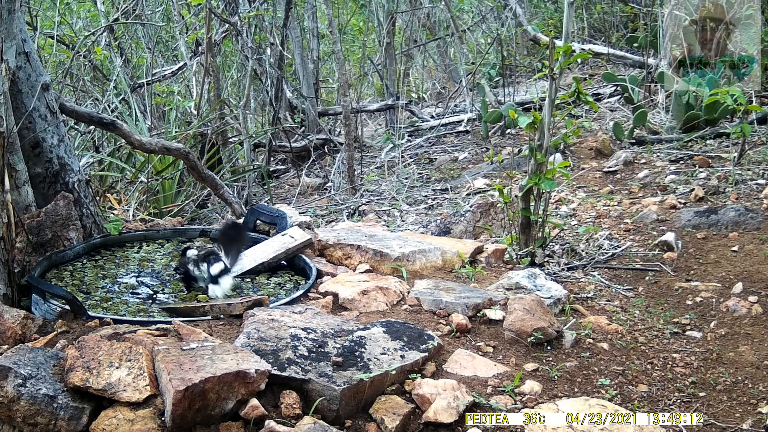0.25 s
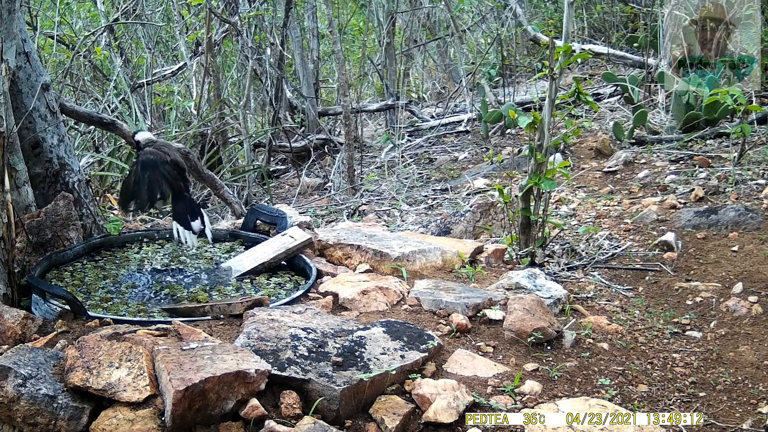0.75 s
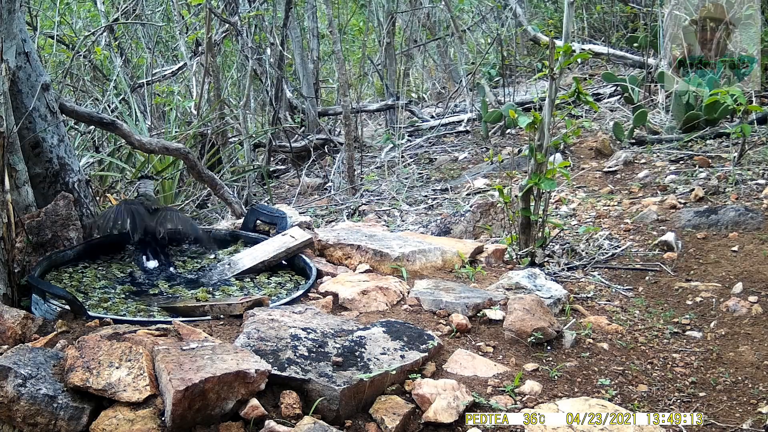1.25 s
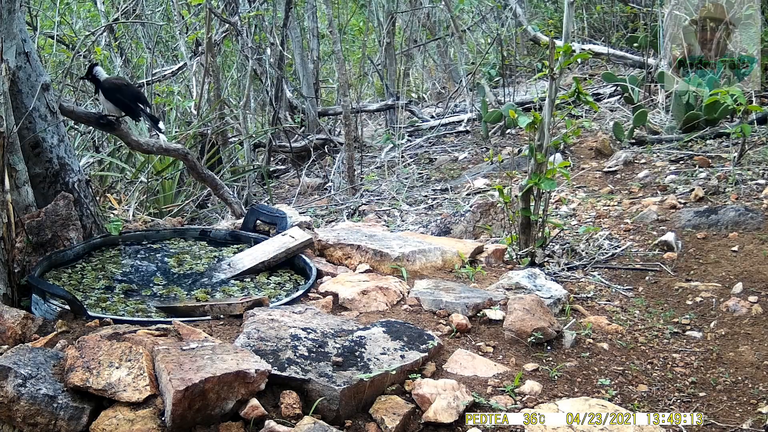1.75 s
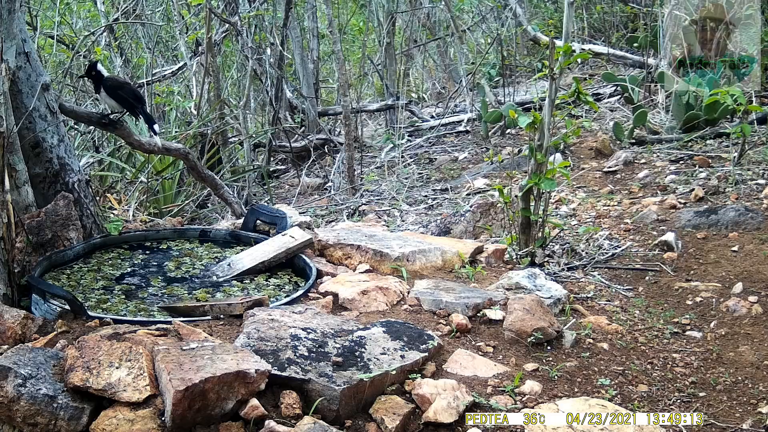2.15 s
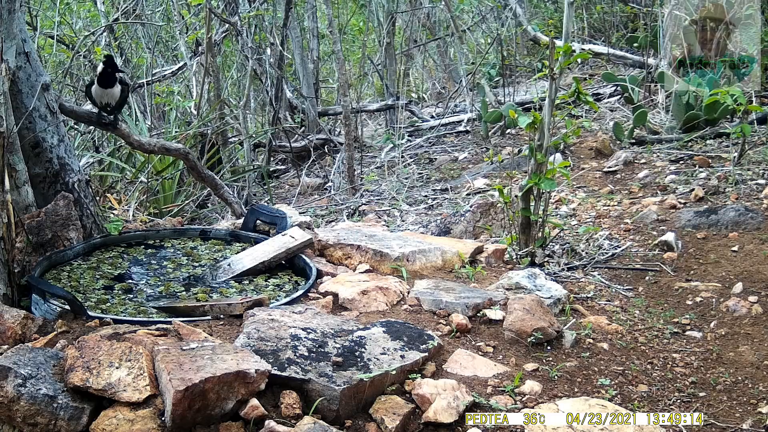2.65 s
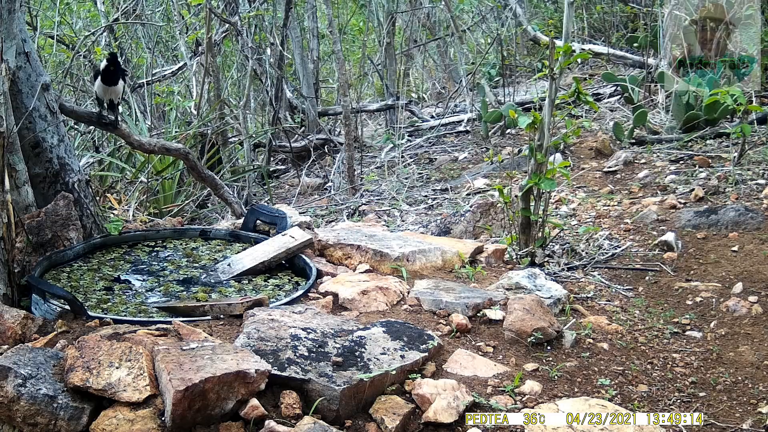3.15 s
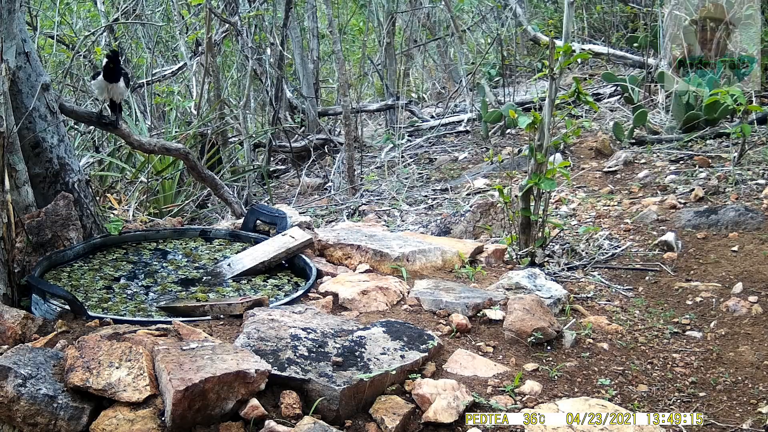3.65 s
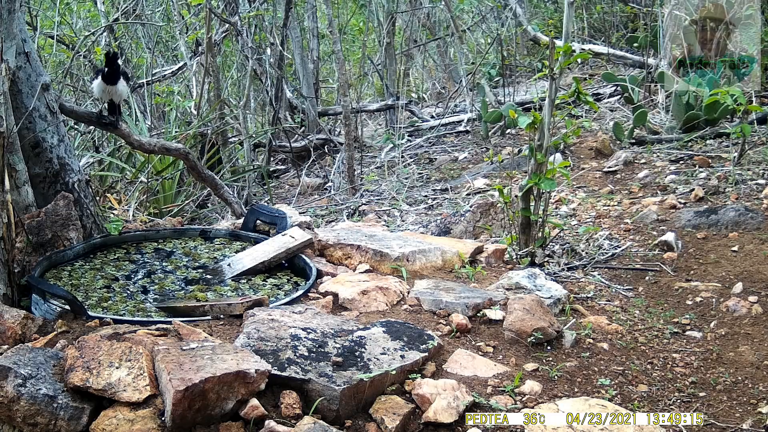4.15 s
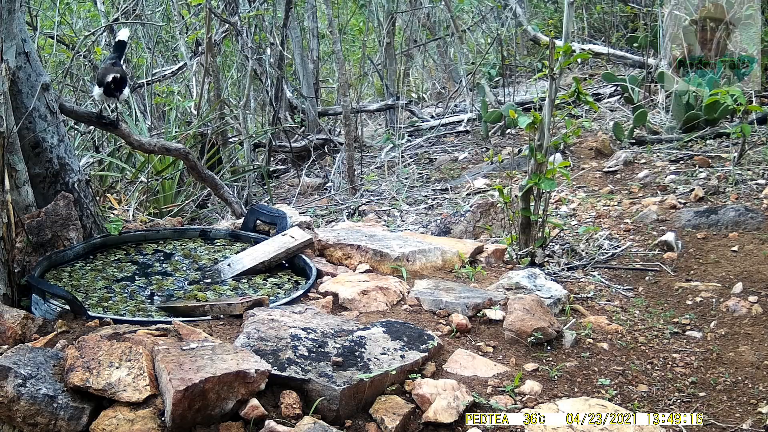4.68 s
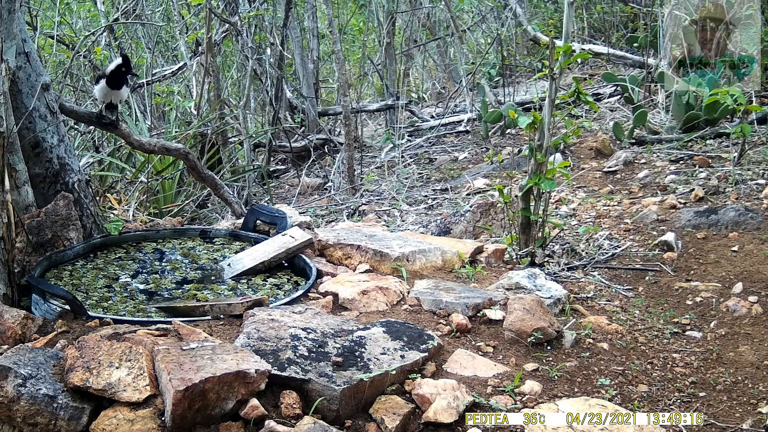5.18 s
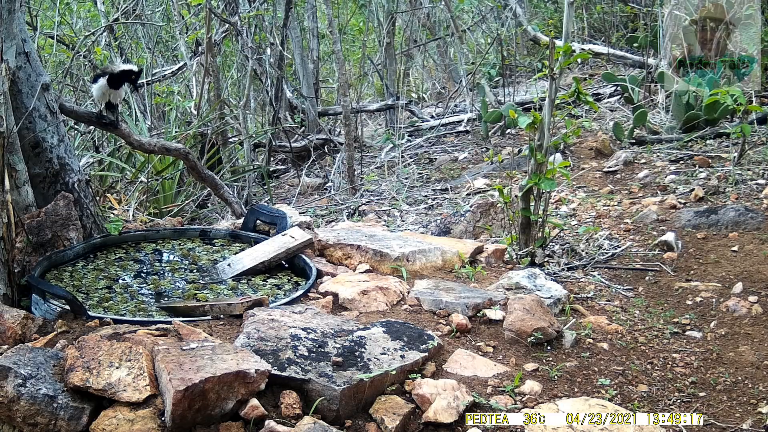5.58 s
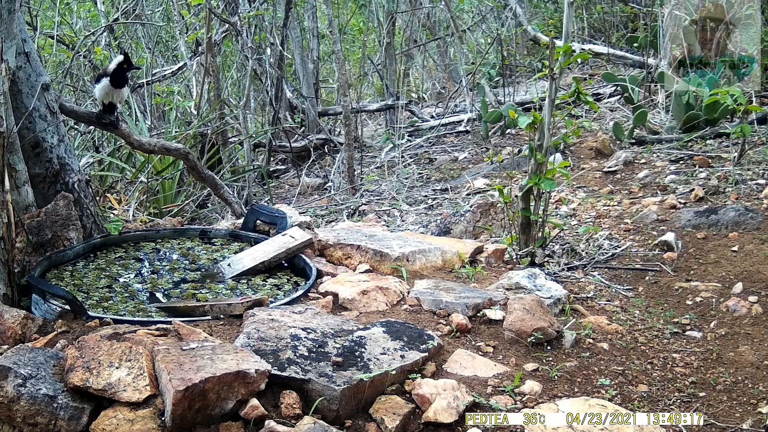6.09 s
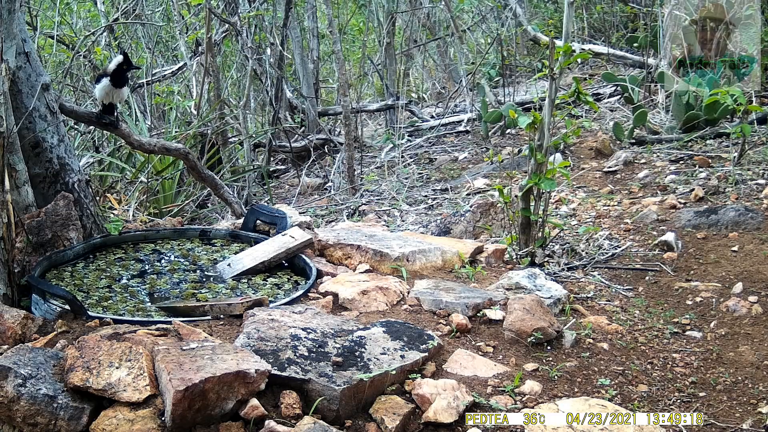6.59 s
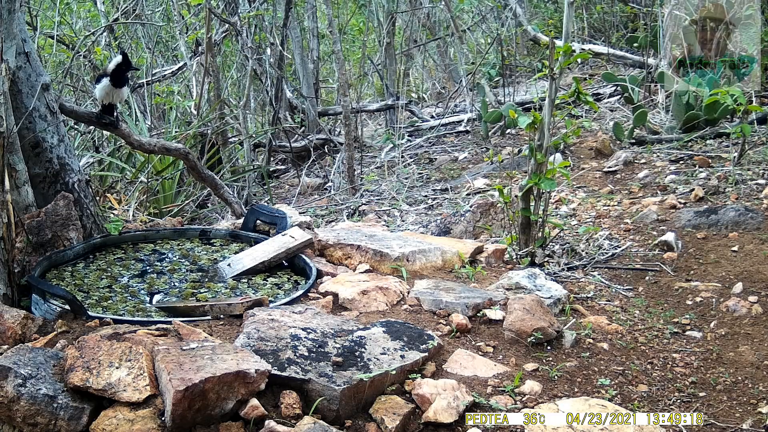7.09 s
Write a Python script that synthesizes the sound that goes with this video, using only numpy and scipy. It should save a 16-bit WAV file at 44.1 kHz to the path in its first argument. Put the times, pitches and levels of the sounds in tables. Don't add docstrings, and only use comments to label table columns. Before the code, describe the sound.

Wet wings flap and splash up from a bird bath, then after a windy pause a jay gives two loud, sharp clinking calls.

```python
import sys
import numpy as np
from scipy import signal
from scipy.fft import rfft, irfft
from scipy.io import wavfile
from scipy.ndimage import uniform_filter1d

SR = 44100
rng = np.random.default_rng(int(sys.argv[2]) if len(sys.argv) > 2 else 0)


def voltage_ratio(level):
    return 10 ** (np.asarray(level, float) / 20)


def dump_mix(stems):
    frames = np.atleast_2d(stems).T
    limited = np.clip(frames, -1, 1)
    pcm = np.round(limited * 32767).astype(np.int16)
    wavfile.write(sys.argv[1], SR, pcm)


N = 323099

# start_s, level_db
GUST = [(0.0, -51.5), (0.3, -44), (2.92, -51.5), (3.02, -38.5), (3.24, -53), (3.38, -34.5), (4.02, -46),
        (4.1, -30.5), (4.16, -39.5), (4.39, -30.5), (4.49, -40), (5.22, -31), (5.28, -44.5), (5.61, -36.5),
        (6.41, -48.5), (6.73, -29.5), (7.04, -43), (7.33, -42)]
# start_s, level_db, cycle_hz
PUFFS = [(.36, -33, 30), (.962, -29, 45), (1.165, -27, 38), (1.325, -32, 96), (1.5, -29.5, 55.6),
         (1.52, -37, 40), (2.479, -35.5, 40), (3.62, -27.5, 30), (4.27, -32, 30), (4.79, -32, 32),
         (5.06, -33, 28), (5.36, -40, 35), (5.58, -32, 30), (5.718, -37, 35.3), (5.875, -31, 40),
         (6.53, -30, 30), (6.7, -20.5, 32.2), (6.759, -29, 45), (6.84, -25.5, 51)]
PUFF_CYCLES = 1.33
# start_s,
# hold_s, level_db
RUSTLES = [
    (.96, 0.019, -52.5),
    (1.17, .18, -52.5),
    (1.5, 0.03, -56),
    (4.12, 0.042, -56),
    (4.48, .02, -43.5),
    (4.73, 0.015, -45),
    (6.76, 0.14, -51.5),
]
RUSTLE_RISE_DB_S, RUSTLE_FALL_DB_S, RUSTLE_BASS_DB = 200, 101, 5.5
# pitch_hz, density_db (per Hz)
RUMBLE_COLOUR = [(40, -18), (70, 2), (130, -2), (250, -7.5), (500, -15.5), (1000, -28)]
# pitch_hz, density_db (per Hz)
HISS_COLOUR = [(240, -5.5), (400, -1.5), (511, -2.5), (653, -2), (715, -3), (1030, -4), (1760, -7),
               (15500, -13)]
RUMBLE_DB, HISS_DB, GUST_TO_RUMBLE_DB, GUST_TO_HISS_DB = -46.5, -52.5, -19.5, -25.5

# start_s (into the phrase), length_s, from_hz, to_hz, level_db
PHRASE = [
    (0, 0.047, 3680, 3640, -54.5),
    (0.034, 0.0164, 4920, 4400, -48.5),
    (.045, .042, 5150, 4350, -53),
    (.096, 0.0363, 3100, 2630, -52),
]
# start_s, gain_db
PHRASES = [
    (3.915, -2),
    (4.065, 0.),
    (4.21, 0.),
    (4.365, 3.5),
]
# start_s, length_s, from_hz, to_hz, level_db
LONE_NOTE = [
    (4.551, 0.045, 2400, 2270, -46),
]

# start_s, peak_db, pitch_hz, ring_cycles
DROPS = [(.668, -38, 4800, 6), (.738, -33, 4530, 3.3), (1.105, -34, 2010, 4.4), (1.1287, -25, 1730, 3),
         (1.13, -28, 2180, 5.2), (1.135, -32.5, 980, 4.8), (1.141, -29, 1800, 5.1), (1.144, -32, 890, 3),
         (1.152, -33, 1450, 6), (1.1625, -15, 696, 0.97), (1.187, -24, 3200, 1.5), (1.189, -23.5, 1750, 2),
         (1.217, -35, 1930, 3.2), (1.2262, -22.5, 2000, 5.4), (1.2543, -22.5, 3500, 0.59),
         (1.2568, -16.5, 3760, 0.74), (1.258, -25, 2220, 1.4), (1.260, -18, 4500, 0.77),
         (1.27, -35, 1800, 3), (1.279, -37, 2300, 2), (1.285, -33, 1880, 6), (1.387, -36, 2060, 4),
         (1.448, -37, 1390, 3), (1.462, -20.5, 3520, 0.86), (1.489, -31, 2300, 4.3),
         (1.533, -35, 1890, 3.6), (2.685, -24, 8500, 1.6), (2.688, -33, 10500, 1.5),
         (3.361, -31, 2400, 1.2), (3.364, -29, 3900, 1.5)]
# start_s, hold_s, level_db
WING_BEATS = [(.62, 0.027, -45), (.68, 0.08, -49.5), (.96, .03, -56), (1.13, 0.076, -40),
              (1.225, 0.0027, -38), (1.24, .012, -44), (1.257, .008, -32.5), (1.266, 0.018, -35.5),
              (1.41, 0.036, -45), (1.458, 0.006, -38.5), (1.49, 0.034, -41.5), (1.54, .03, -54)]
BEAT_RISE_DB_S, BEAT_FALL_DB_S = 900, 698
# pitch_hz, density_db (per Hz)
SPRAY_COLOUR = [(180, -39), (300, -12), (714, -4), (801, -7), (943, -3.5), (2140, -8.5), (15000, -22)]

# start_s, length_s, low_opening_hz, low_settled_hz, high_hz
JAY_CALLS = [
    (4.4347, .068, 1697, 1566, 2702),
    (4.6537, .071, 1648, 1540, 2670),
]
# low_multiple, high_multiple, level_db
PARTIALS = [(1, 0, 0), (2, 0, -21), (3, 0, -15), (4, 0, -32), (5, 0, -27), (6, 0, -28), (7, 0, -26),
            (9, 0, -25), (0, 1, -3), (0, 2, -17.5), (0, 3, -31), (0, 4, -29.5), (1, 1, -0.5),
            (-1, 1, -24.5), (-2, 2, -17), (2, 1, -24.5), (1, 2, -21), (2, 2, -26.5), (1, 3, -23),
            (2, 3, -61), (-1, 2, -26)]
# start_s, length_s, from_hz, to_hz, level_db
LEAD_IN = [(4.421, 0.017, 6520, 5460, -28), (4.426, 0.0048, 5500, 5100, -22),
           (4.424, .01, 11800, 10200, -46), (4.434, 0.01, 3430, 3370, -19), (4.434, 0.011, 5110, 5090, -15),
           (4.448, 0.038, 4945, 5000, -28), (4.462, .016, 3400, 3360, -40),
           (4.452, .045, 13800, 14600, -32), (4.642, 0.0156, 5700, 4400, -29),
           (4.643, 0.012, 11100, 9300, -38), (4.654, 0.021, 4800, 5020, -23),
           (4.68, .024, 13800, 13960, -28)]
# start_s, hold_s, level_db
LOW_STROKES = [(4.435, 0.0045, -24), (4.463, 0.0028, -9.5), (4.488, 0.002, -23), (4.656, 0.0084, -24),
               (4.681, 0.00465, -12.5), (4.699, 0.0025, -15), (4.717, .003, -24)]
# start_s, hold_s, level_db
HIGH_STROKES = [(4.435, .005, -8.5), (4.4405, 0.0079, -4), (4.448, 0.007, -7.5), (4.46, .007, -22),
                (4.4795, 0.0022, -18), (4.4865, 0.0024, -13.5), (4.4995, .005, -24), (4.655, 0.0095, -10),
                (4.664, 0.0063, -20), (4.672, 0.0044, -11.5), (4.699, .002, -10.5), (4.703, .005, -18),
                (4.717, .003, -24)]
# start_s, hold_s, level_db
MIXED_STROKES = [(4.437, 0.0051, -8), (4.449, .007, -19), (4.462, .012, -34), (4.4795, 0.0041, -9.5),
                 (4.49, 0.012, -30), (4.656, 0.0097, -15), (4.669, 0.0061, -25), (4.699, 0.0018, -10),
                 (4.705, 0.0044, -26), (4.717, 0.0027, -21), (4.721, .007, -26)]
LOW_RISE_DB_S, LOW_FALL_DB_S = 2500, 750
HIGH_RISE_DB_S, HIGH_FALL_DB_S = 6000, 4000
MIXED_RISE_DB_S, MIXED_FALL_DB_S = 6000, 3200
OPEN_S, CLOSE_S = .0015, .008
SETTLE_S = 0.0146
OPENING_SHARP_HZ, OPENING_SHARP_S = 30, .008
LAST_NOTE_S, SHARP_HZ, SHARP_S = 0.042, 130, .005
WOBBLE_HZ = 28
RASP_DB, BREATH_DB = -29.5, -24

ECHO_T60_S, ECHO_DB, ECHO_PER_S = 0.13, -15.5, 3000
FAR_ECHO_T60_S, FAR_ECHO_DB = .38, -11

STARVED = [.22, .312, .591, 1.218, 1.311, 1.706, 1.938, 2.031, 2.1, 2.193, 2.309, 2.472, 2.518, 2.588, 2.75,
           2.843, 2.89, 3.145, 3.215, 3.888, 5.467, 6.024, 6.117, 6.164, 6.419, 6.489, 6.721, 6.837, 7.046,
           7.093]
STARVED_ON = [1.241, 1.729, 2.054, 2.913]
FRAME, FIRST_SAMPLE = 1024, 464
KEPT = .03
CUTOFF_HZ, GRIT_DB = 15850, -32.5


def rms_one(x):
    return x / np.sqrt(np.mean(x ** 2) + 1e-20)


def in_time(rows):
    s, *columns = np.transpose(rows)
    return [np.interp(np.arange(N) / SR, s, c) for c in columns]


def band(x, low_hz, high_hz):
    return signal.sosfilt(signal.butter(2, [low_hz, high_hz], "band", fs=SR, output="sos"), x)


def coloured(spectrum, grains=1):
    hz, db = np.transpose(spectrum)
    bins = np.arange(N // 2 + 1) * SR / N + 1
    gain = voltage_ratio(np.interp(np.log(bins), np.log(hz), db))
    return rms_one(irfft(rfft(grains * rng.standard_normal(N)) * gain, N))


def strokes(rows, t, rise_db_s, fall_db_s):
    s, hold, db = np.transpose(rows)[:, :, None]
    rise = rise_db_s * np.maximum(s - t, 0)
    fall = fall_db_s * np.maximum(t - s - hold, 0)
    return np.max(db - rise - fall, axis=0)


def whistles(rows, blur):
    out = np.zeros(N)
    shimmer = rms_one(band(rng.standard_normal(N), 30, 500))
    for s, length, from_hz, to_hz, db in rows:
        t = np.arange(int(length * SR)) / SR
        at = slice(int(s * SR), int(s * SR) + len(t))
        phase = 2 * np.pi * (from_hz * t + (to_hz - from_hz) * t ** 2 / (2 * length))
        arch = np.sin(np.pi * t / length)
        out[at] += voltage_ratio(db) * arch * (1 + blur * shimmer[at]) * np.sin(phase)
    return out


def puffs():
    out = np.zeros(N)
    for s, db, hz in PUFFS:
        cycles = np.arange(int(PUFF_CYCLES * SR / hz)) * hz / SR
        start = int(s * SR)
        swing = np.sin(2 * np.pi * cycles) * np.sin(np.pi * cycles / PUFF_CYCLES)
        out[start:start + len(cycles)] -= voltage_ratio(db) * swing
    return out


def air():
    gust = voltage_ratio(in_time(GUST)[0])
    rustle = voltage_ratio(strokes(RUSTLES, np.arange(N) / SR, RUSTLE_RISE_DB_S, RUSTLE_FALL_DB_S))
    wind_rumble, wind_hiss = voltage_ratio(GUST_TO_RUMBLE_DB) * gust, voltage_ratio(GUST_TO_HISS_DB) * gust
    rumble = np.sqrt(voltage_ratio(RUMBLE_DB) ** 2 + wind_rumble ** 2 + (voltage_ratio(RUSTLE_BASS_DB) * rustle) ** 2)
    hiss = np.sqrt(voltage_ratio(HISS_DB) ** 2 + wind_hiss ** 2 + rustle ** 2)
    buffet = rms_one(band(rng.standard_normal(N), 14.2, 40.3))
    noise = rumble * coloured(RUMBLE_COLOUR) + voltage_ratio(3.5) * hiss * coloured(HISS_COLOUR)
    return gust * buffet + puffs() + noise


def songbird():
    notes = []
    for s, gain_db in PHRASES:
        for into, length, from_hz, to_hz, db in PHRASE:
            notes.append((s + into, length, from_hz, to_hz, db + gain_db))
    return whistles(notes + LONE_NOTE, blur=0.9)


def drops():
    out = np.zeros(N)
    for s, db, hz, lasts in DROPS:
        cycles = np.arange(int(5 * lasts * SR / hz)) * hz / SR
        decay = np.exp(-cycles / lasts) * np.minimum(1, cycles / 0.38)
        ring = np.sin(2 * np.pi * cycles * (1 + 0.0046 * cycles)) * decay
        start = int(s * SR)
        out[start:start + len(ring)] += voltage_ratio(db) * ring
    return out


def spray():
    crackle = voltage_ratio(3.6 * rms_one(band(rng.standard_normal(N), 30, 600)))
    droplets = .5 + 3.0 * (rng.random(N) < 900 / SR)
    spray_db = strokes(WING_BEATS, np.arange(N) / SR, BEAT_RISE_DB_S, BEAT_FALL_DB_S)
    return voltage_ratio(spray_db - 4.0) * rms_one(crackle * coloured(SPRAY_COLOUR, droplets))


def scrub(x):
    t = np.arange(int(.4 * SR)) / SR
    taps = rng.standard_normal(len(t)) * (rng.random(len(t)) < ECHO_PER_S / SR) * (t > .004)
    decay = voltage_ratio(-60 * t / ECHO_T60_S) + voltage_ratio(FAR_ECHO_DB - 60 * t / FAR_ECHO_T60_S)
    taps = band(taps * decay, 1900, 12000)
    return x + voltage_ratio(ECHO_DB) * signal.oaconvolve(x, taps / np.sqrt(np.sum(taps ** 2)))[:N]


def jay():
    out = whistles(LEAD_IN, blur=0.19)
    for start, length, opening_hz, settled_hz, steady_hz in JAY_CALLS:
        at = np.arange(int((start - OPEN_S) * SR), int((start + length + CLOSE_S) * SR))
        t = at / SR - start
        since = np.maximum(t, 0)
        low_hz = settled_hz + (opening_hz - settled_hz) * np.exp(-since / SETTLE_S)
        high_hz = steady_hz + OPENING_SHARP_HZ * np.exp(-since / OPENING_SHARP_S)
        high_hz += SHARP_HZ * (t > LAST_NOTE_S) * np.exp(-np.abs(t - LAST_NOTE_S) / SHARP_S)
        low_db = strokes(LOW_STROKES, at / SR, LOW_RISE_DB_S, LOW_FALL_DB_S)
        high_db = strokes(HIGH_STROKES, at / SR, HIGH_RISE_DB_S, HIGH_FALL_DB_S)
        mixed_db = strokes(MIXED_STROKES, at / SR, MIXED_RISE_DB_S, MIXED_FALL_DB_S)
        beak = np.clip(np.minimum(1 + t / OPEN_S, 1 + (length - t) / CLOSE_S), 0, 1) ** 2
        wobble = WOBBLE_HZ * rms_one(band(rng.standard_normal((2, len(at))), 34, 270))
        low, high = 2 * np.pi * np.cumsum([low_hz, high_hz] + wobble, axis=1) / SR
        air_rush = rms_one(band(rng.standard_normal(len(at)), 1800, 5900))
        breath = voltage_ratio(high_db) + voltage_ratio(mixed_db) + 0.31 * voltage_ratio(low_db)
        out[at] += beak * voltage_ratio(BREATH_DB) * breath * air_rush
        for m, n, db in PARTIALS:
            effort_db = mixed_db if m and n else low_db if m else high_db
            roughness = rms_one(band(rng.standard_normal(len(at)), 56, 860))
            rasp = 1 + voltage_ratio(RASP_DB) * (abs(m) + n) * roughness
            tone = np.sin(m * low + n * high + rng.uniform(0, 2 * np.pi))
            out[at] += beak * np.sqrt(2) * voltage_ratio(effort_db + db) * rasp * tone
    return out


def scene():
    return (scrub(jay() + drops() + spray()) + songbird() + air())[None]


def starve(x):
    n = np.arange(2 * FRAME) + .5
    window = np.sin(np.pi * n / (2 * FRAME))
    basis = np.cos(np.pi / FRAME * np.outer(np.arange(FRAME) + .5, n + FRAME / 2)) * window
    tilt = (np.arange(FRAME) + 60) ** -.25
    out = x.copy()
    for s in sorted(STARVED + STARVED_ON):
        start = FIRST_SAMPLE + FRAME * round((s * SR - FIRST_SAMPLE) / FRAME - 1)
        lines = basis @ x[start:start + 2 * FRAME]
        step = 2 * tilt * np.quantile(np.abs(lines / tilt)[130:700], 1 - KEPT)
        rounding = step * np.round(lines / step) - lines
        out[start:start + 2 * FRAME] += 2 / FRAME * rounding @ basis
    return out


def band_limit(x):
    return signal.sosfilt(signal.butter(12, 15640, fs=SR, output="sos"), x)


def record(dry):
    loudness = uniform_filter1d(np.abs(np.diff(dry, prepend=0)), size=128)
    grit = loudness * band(rng.standard_normal(dry.shape), 990, 19000)
    clipped = np.clip(dry + voltage_ratio(GRIT_DB) * 4.0 * grit, -.93, .93)
    dulled = signal.sosfilt(signal.cheby2(16, 60, CUTOFF_HZ, fs=SR, output="sos"), clipped)
    mix = starve(dulled[0])[None]
    return band_limit(mix)


dry = scene()
out = record(dry)
dump_mix(out)
```